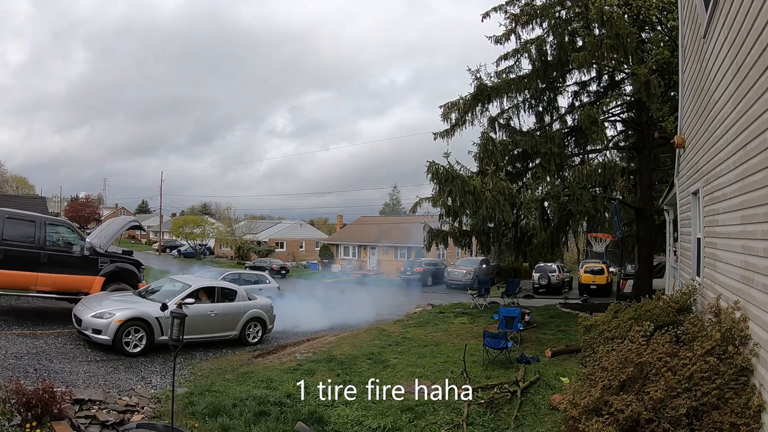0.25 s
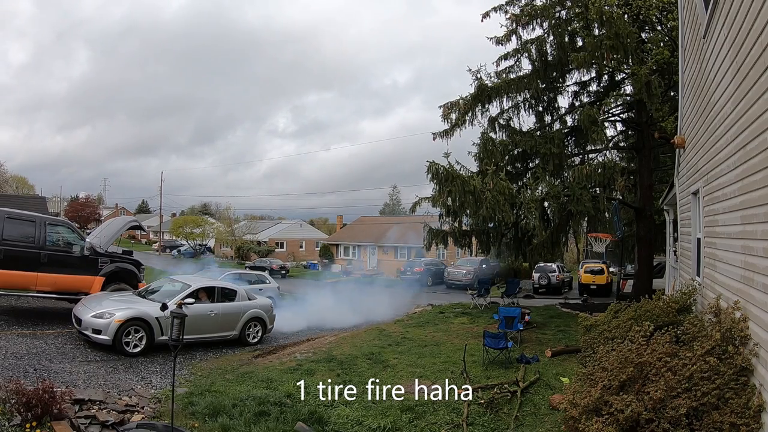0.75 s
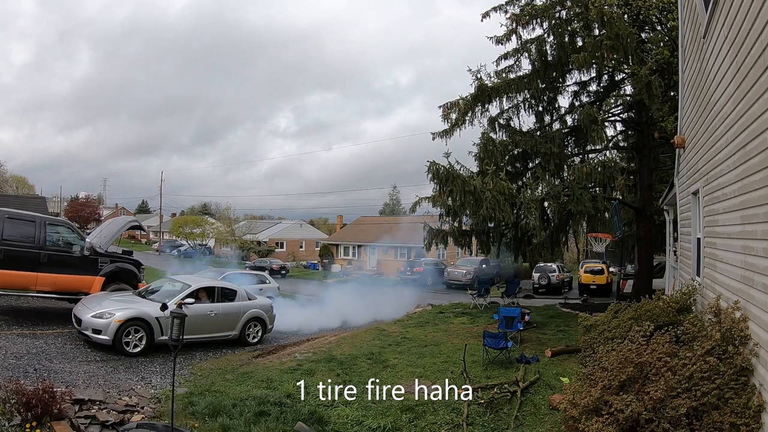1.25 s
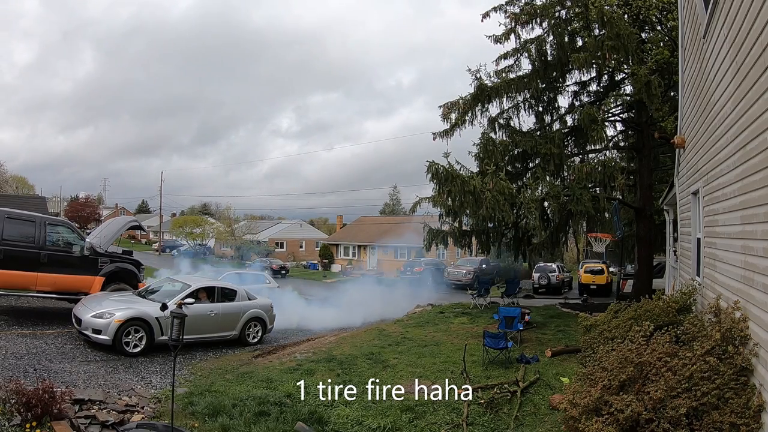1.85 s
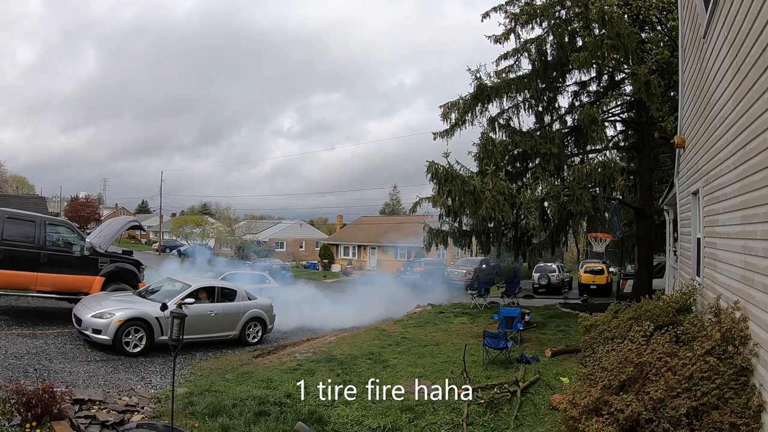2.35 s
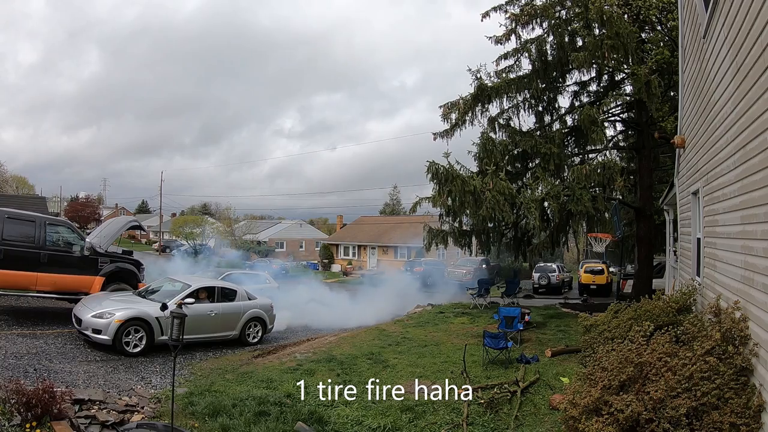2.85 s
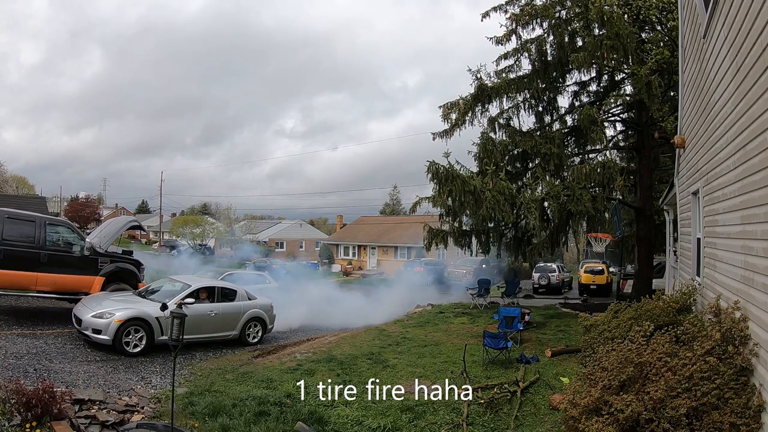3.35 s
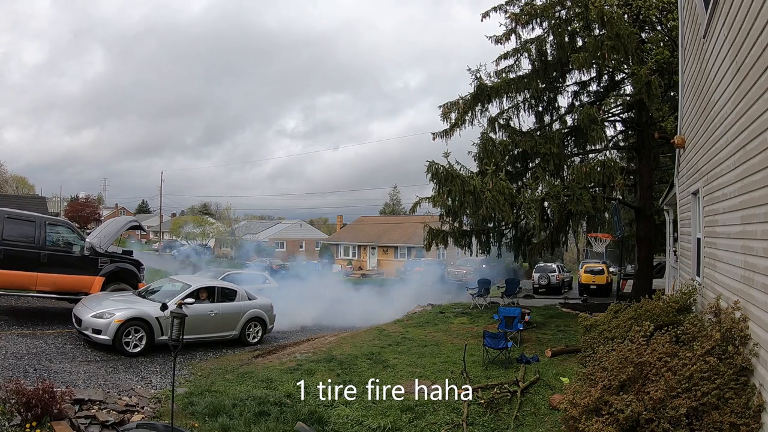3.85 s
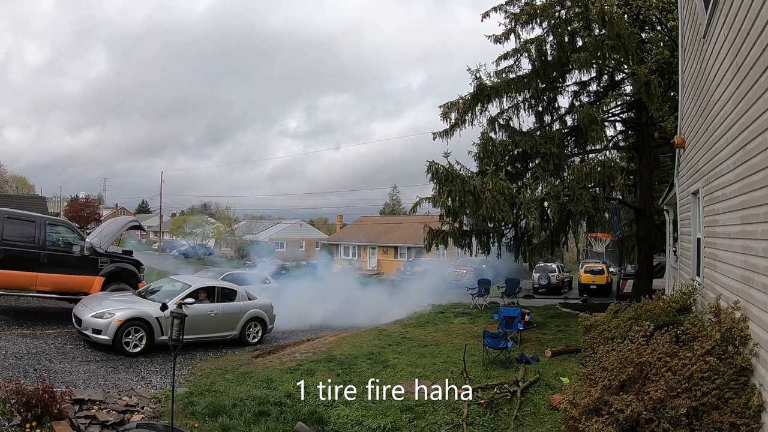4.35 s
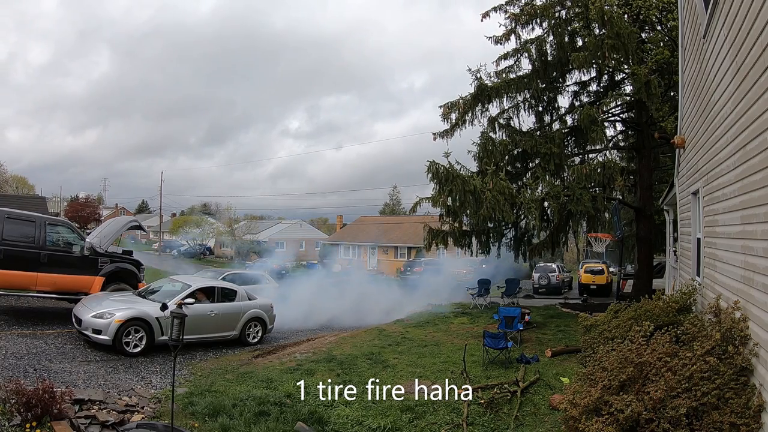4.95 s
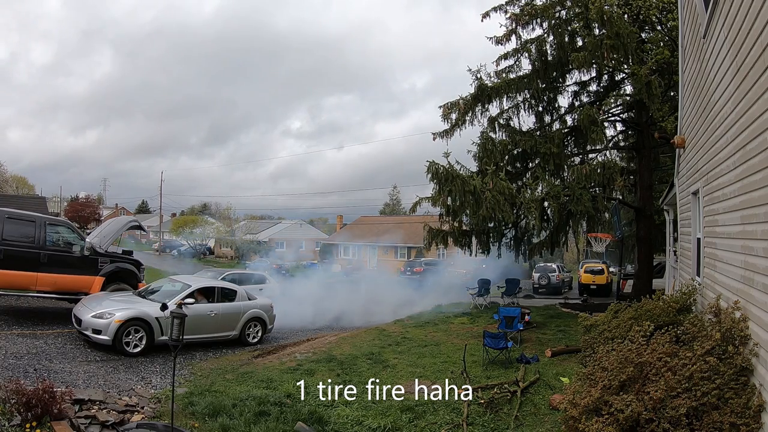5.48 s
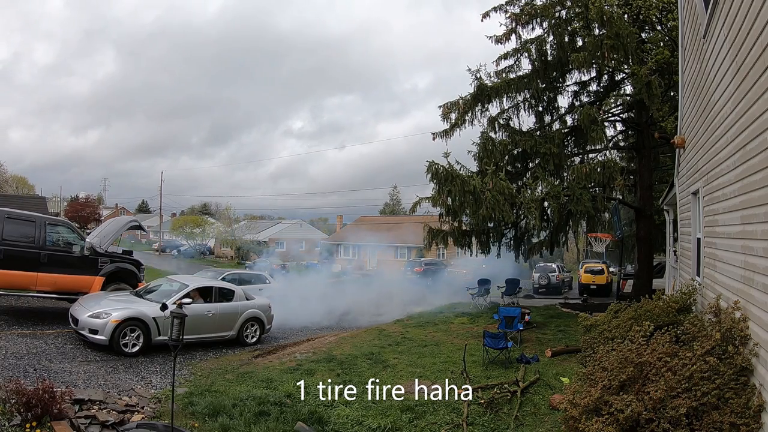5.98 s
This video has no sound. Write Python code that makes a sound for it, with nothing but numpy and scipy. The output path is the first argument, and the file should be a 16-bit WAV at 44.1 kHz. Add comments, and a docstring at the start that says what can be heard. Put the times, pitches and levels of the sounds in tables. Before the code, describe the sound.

A very loud car engine is already at high revs, blaring and rasping through an open exhaust while one spinning tyre hisses roughly on a driveway. The rasp and hiss are strongest at about 0.2 seconds. The engine then bogs down, its booming note falling steadily in pitch. Around 2 seconds the throttle shuts and the tyre hiss dies away, followed by a short spit of air at about 2.4 seconds. From 2.5 to 5.5 seconds the engine holds a quieter, lumpy idle, with a hollow knocking from the muffler and a light chattering hiss. From about 5.5 seconds the revs rise again, with a faint thin whistle swelling twice just before 6 seconds, and are still climbing at the end. It is all heard outdoors from one fixed microphone, with a faint low background rumble.

```python
"""First comes the blare of a rotary engine's open exhaust, over the hiss of one spinning tyre.
The car is in a driveway, heard from one fixed microphone. The burnout bogs down, the throttle
shuts with a spit of air, and the engine drops to a lumpy idle, then picks up with a thin whistle.
Every firing rings the same pipe resonances; gas rasps in the tailpipe under load, and at idle
the muffler shell knocks. Nearby walls, cars and gravel throw the hiss back."""
import sys
import numpy as np
from scipy import signal
from scipy.fft import rfft, irfft, next_fast_len
from scipy.io import wavfile
from scipy.ndimage import uniform_filter1d, map_coordinates

SR = 44100
rng = np.random.default_rng(int(sys.argv[2]) if len(sys.argv) > 2 else 0)


def store_pcm(level_fs):
    """Save levels as 16-bit WAV."""
    pcm = np.round(np.clip(level_fs, -1, 1) * 32767).astype(np.int16)
    wavfile.write(sys.argv[1], SR, np.atleast_2d(pcm).T)


N = 274302

# Engine revs, two firings a shaft turn: time_s, firing_hz
FIRING_RATE = [(0.0, 173.806), (0.085, 164.047), (0.278, 118.248), (0.573, 109.966), (1.044, 89.731),
               (1.411, 80.6), (1.832, 72.607), (1.948, 58.46), (2.259, 40.753), (2.525, 33.344),
               (3.118, 34.852), (4.195, 32.535), (5.298, 32.736), (5.641, 37.878), (6.22, 51.878)]
# Wide open, shut, back to idle, opening again: time_s, opening (0-1)
THROTTLE_OPENING = [(0, 1), (1.82, 0.97), (1.95, 0.44), (2.12, 0), (2.3, 0.19), (2.75, 0.15), (3.5, 0.38),
                    (5.3, 0.37), (5.48, 0.33), (5.63, 0.58), (5.9, 0.61), (6.22, 0.84)]
# The boom swells and sags as the revs cross the pipe's resonances: time_s, level_db
BOOM_LEVEL = [(0.0, -7), (0.07, -10), (0.19, -12.5), (0.22, -11), (0.57, -15.5), (0.69, -18), (0.83, -12.5),
              (1.02, -10.5), (1.61, -11), (2.11, -16.5), (2.15, -20.5), (2.36, -16), (2.49, -22),
              (2.65, -19.5), (3.2, -20), (3.46, -17), (5.16, -16.5), (5.53, -18), (5.58, -15.5),
              (6.22, -14)]
# The engine strains against the tyre at the start: centre_s, half_length_s, extra_bite_db
ENGINE_STRAIN = (0.16, .13, 17.3)
# The tyre grabs: centre_s, half_length_s, extra_hiss_db, extra_rasp_db
TYRE_GRAB = (0.17, 0.1, 8.4, 5.2)
# Load steepens the pulses, more so as the engine lugs: idle_db, load_gain_db, lug_db_per_octave
BITE_LAW = (-16, 13, 19)
# Gain against throttle and revs: open_at_cruise_db, shut_loss_db, revs_db_per_octave
RASP_LAW = (-35, 14.5, 3.5)
HISS_LAW = (-40.5, 18.5, -0.5)

# Resonances: pitch_hz, width_hz, gain_db, polarity
PIPE_MODES = [(65.5, 5.2, -14.5, -1), (74.5, 8.6, -10.5, -1), (112.2, 18.4, -10.5, -1),
              (138.7, 4.85, -5.5, 1), (159.2, 19.85, -0.5, 1), (199.96, 17, 0.48, -1),
              (208.2, 46.05, -2.5, 1), (245.6, 28.6, -2.5, -1), (335.6, 11.4, -10, -1),
              (379.6, 10.8, -20, 1), (407.3, 31, -21.5, -1), (495, 4.4, -36, 1), (528.6, 34, -29, -1),
              (582, 10, -31, 1)]  # the exhaust's boom
TAILPIPE_MODES = [(565, 53, -1, 1), (727, 34, -0.5, -1), (785, 22, -3.5, 1), (920, 20, -3, -1),
                  (965.7, 11, 1, 1), (1132, 26, -3.5, -1), (1424, 34, -15, 1), (1701, 49, -4.5, -1),
                  (1960, 13, -5, 1), (2262, 22, -10, -1), (3450, 19, -9, 1)]  # sing under load
SHELL_MODES = [(738, 29, 0, 1), (946, 21, 4, -1), (1152, 12, 1, 1), (1388, 22, 4, -1), (2136, 28, -2, 1),
               (2780, 16, -5.5, -1), (2954, 54, -13, 1), (3340, 19, -7, -1), (3994, 37, -25.5, 1),
               (4470, 55, -8.5, -1)]  # the muffler shell, knocked at idle
HOLLOW_MODES = [(351.2, 11, 8.5, -1), (420, 36, -10, 1), (543, 53, -8.5, -1), (581.6, 24, 5, 1)]  # pipe notes that one rotor rings harder

# Noise colours: frequency_hz, relative_density_db
GAS_SPECTRUM = [(40, -27), (170, 6), (300, 8), (470, -2), (680, -3), (900, -7), (1400, -10), (2100, -15),
                (3000, -33), (6000, -52.5), (12000, -88.5)]  # turbulent exhaust gas
TYRE_SPECTRUM = [(700, -30), (1700, 1.5), (2600, 1), (3400, 0.5), (4000, -1.5), (4900, 0), (6200, 0),
                 (8200, -10.5), (9700, -18), (10800, -37.5), (12500, -26), (15500, -36.5)]  # rubber scrubbing the driveway
BAY_SPECTRUM = [(900, -26.5), (2000, -5), (3400, -4.5), (4400, -1.5), (5000, -4), (6500, -1.5), (8500, -10),
                (10000, -15), (11200, -21.5), (15500, -46.5)]  # hiss from the engine bay

# A spit of air as the revs fall: start_s, level_db
AIR_SPITS = [(2.3572, -34.5)]
# The whistle swells as the revs pick up: centre_s, half_length_s, peak_db
WHISTLE_SWELLS = [(5.73, .13, -52), (5.936, 0.08, -45)]

IDLE_THROTTLE = 0.39  # above this the engine pulls against the tyre
CRUISE_HZ, LUG_HZ = 100, 114  # firing rates: reference for rasp and hiss; onset of lugging
FULL_SPIN_HZ = 177  # firing rate at which, on full load, the hiss is all tyre
TOP_HZ = 15700


def amp(db):
    """Decibels to amplitude."""
    return 10 ** (np.asarray(db) / 20)


def unit(x):
    """x at rms 1."""
    return x / np.sqrt(np.mean(x ** 2) + 1e-20)


def steady(x):
    """x at rms 1 over every few firings."""
    power = uniform_filter1d(uniform_filter1d(x ** 2, size=SR // 16), size=SR // 20)
    return x / np.sqrt(np.abs(power) + 1e-20)


def curve(rows):
    """One value a sample from (time_s, value) points."""
    return np.interp(np.arange(N) / SR, *np.transpose(rows))


def swell(centre_s, half_s):
    """A bell-shaped rise and fall of height 1."""
    return np.exp(-((np.arange(N) / SR - centre_s) / half_s) ** 2)


def wobble(rate_hz):
    """A smooth random curve, rate_hz knots a second."""
    knots = rng.standard_normal(int(N * rate_hz / SR) + 4)
    return map_coordinates(knots, [np.arange(N) * rate_hz / SR])


def filtered(x, response):
    """x through a complex frequency response."""
    size = next_fast_len(N + SR // 2)
    return irfft(rfft(x, size) * response(np.fft.rfftfreq(size, 1 / SR)), size)[:N]


def noise(spectrum):
    """Noise of rms 1 coloured by (frequency_hz, relative_density_db) points."""
    points_hz, db = np.transpose(spectrum)
    colour = lambda hz: amp(np.interp(np.log(hz + 1), np.log(points_hz), db))
    return unit(filtered(rng.standard_normal(N), colour))


def ring(x, modes):
    """x through damped resonances; the top rolls off above about 7 kHz."""
    def response(hz):
        peaks = sum(polarity * amp(db) * 1j * hz * width / (pitch ** 2 - hz ** 2 + 1j * hz * width)
                    for pitch, width, db, polarity in modes)
        return peaks / (1 + (hz / 7000) ** 6)
    return filtered(x, response)


def pulses(firings, lope_db, scatter_db, jitter_s=40e-6):
    """One impulse at each whole count of firings; one rotor fires harder than the other."""
    count = np.arange(np.ceil(firings[0]), firings[-1]).astype(int)
    slip, scatter = rng.standard_normal((len(count), 2)).T
    on_time = np.interp(count, firings, np.arange(N))
    position = np.clip(on_time + jitter_s * SR * slip, 0, N - 2)
    size = amp(lope_db * (-1) ** count + scatter_db * scatter)
    whole, part = position.astype(int), position % 1
    return np.bincount(whole, size * (1 - part), N) + np.bincount(whole + 1, size * part, N)


def throb(firings, fall_db, lope_db):
    """A rounded puff of gain at each firing, higher for one rotor."""
    count, age = np.divmod(firings, 1)
    return uniform_filter1d(amp(-fall_db * age + lope_db * np.cos(np.pi * count)), size=SR // 110)


def driven_db(law, throttle, firing_hz):
    """The gain of a layer that follows throttle and revs."""
    open_db, shut_db, octave_db = law
    return open_db - shut_db * (1 - throttle) + octave_db * np.log2(firing_hz / CRUISE_HZ)


def exhaust_boom(firings, firing_hz, load, corner_hz=189):
    """Round pulses at idle, steep ones under load, ring the open pipe."""
    idle_db, load_db, lug_db = BITE_LAW
    strain_s, half_s, strain_db = ENGINE_STRAIN
    lug = load ** 4 * np.maximum(np.log2(LUG_HZ / firing_hz), 0)  # only near full load
    bite_db = idle_db + load_db * load + lug_db * lug + strain_db * swell(strain_s, half_s)
    sharp = pulses(firings, lope_db=0.45, scatter_db=0.13, jitter_s=20e-6)
    rounded = filtered(sharp, lambda hz: 1 / (1 + (hz / corner_hz) ** 6))
    return steady(ring(rounded + amp(bite_db) * (sharp - rounded), PIPE_MODES))


def tailpipe_rasp(firings):
    """Under load each firing cracks in the tailpipe and drives out turbulent gas."""
    gate = throb(firings - 0.068, fall_db=4.5, lope_db=-4.5)  # just behind the crack
    cracks = steady(pulses(firings, lope_db=4, scatter_db=1))
    puffs = unit(gate * rng.standard_normal(N))
    gas = unit(gate * noise(GAS_SPECTRUM))
    return steady(ring(cracks + amp(-1) * puffs, TAILPIPE_MODES)) + amp(5) * gas


def tyre_scrub(firings):
    """The spinning tyre scrubs the ground: a rough hiss that pulses with the firings."""
    scrub = noise(TYRE_SPECTRUM) * amp(1.2 * wobble(400) + 0.37 * np.cos(2 * np.pi * firings))
    return driveway_echo(scrub, wet_db=-9, t60_s=0.11)


def driveway_echo(x, wet_db, t60_s):
    """The direct sound plus a short scatter off nearby walls, cars and gravel, at rms 1."""
    t = np.arange(SR // 8) / SR
    tail = rng.standard_normal(len(t)) * amp(-60 * t / t60_s)
    echo = signal.fftconvolve(x, tail / np.linalg.norm(tail))[:N]
    return unit(x + amp(wet_db) * echo)


def engine_hiss(firings, flare_db=4):
    """The engine bay's hiss chatters with each firing, and its treble bands flare at random."""
    bands = signal.stft(noise(BAY_SPECTRUM), nperseg=256)[2]
    flares = uniform_filter1d(rng.standard_normal(bands.shape), size=4, axis=0)
    flares = unit(uniform_filter1d(flares, size=7, axis=1))  # each lasts about 20 ms
    hiss = signal.istft(bands * amp(flare_db * flares), nperseg=256)[1][:N]
    chatter = hiss * throb(firings, fall_db=12, lope_db=1.4)
    return driveway_echo(chatter, wet_db=-2, t60_s=0.066)


def outdoor_rumble():
    """The faint, low background of the open air around the microphone."""
    return noise([(20, -13), (60, -6), (200, -6.5), (1000, -32.5), (8000, -56), (12000, -85.5)])


def idle_knock(firings):
    """At idle one rotor knocks the muffler shell, the other rings hollow notes of the pipe."""
    blows = steady(pulses(firings, lope_db=-2.5, scatter_db=1))
    puffs = unit(throb(firings, fall_db=10.5, lope_db=1) * rng.standard_normal(N))
    shell = steady(ring(blows + amp(4) * puffs, SHELL_MODES))
    hollow = steady(ring(pulses(firings + 0.15, lope_db=4, scatter_db=0.7), HOLLOW_MODES))
    gas = unit(throb(firings, fall_db=2.5, lope_db=-1.5) * noise(GAS_SPECTRUM))
    return amp(-3) * shell + amp(1.5) * hollow + gas


def air_spit(attack_s=0.0037, t60_s=0.11):
    """A quick burst of air after the throttle shuts."""
    level = 0
    for start_s, db in AIR_SPITS:
        age = np.maximum(np.arange(N) / SR - start_s, 0)
        level += amp(db - 60 * age / t60_s) * (1 - np.exp(-age / attack_s))
    return level * noise([(400, 0), (2000, 4), (4500, 0), (8000, -2), (11000, -40), (15000, -31.5)])


def air_whistle(firings):
    """Pulsing air sings in two narrow bands."""
    level = sum(amp(db) * swell(centre_s, half_s) for centre_s, half_s, db in WHISTLE_SWELLS)
    flow = rng.standard_normal(N) * throb(firings, fall_db=3, lope_db=1)
    notes = [(3410, 260, 0.5, 1), (6370, 720, 3, 1)]  # pitch_hz, width_hz, gain_db, polarity
    return level * unit(ring(ring(flow, notes), notes))


def scene():
    """The car from one spot in the driveway: firings set the pulse, throttle and revs the balance."""
    firing_hz, throttle = curve(FIRING_RATE), curve(THROTTLE_OPENING)
    firings = 1.19 + np.cumsum(firing_hz) / SR  # running count
    load = np.clip((throttle - IDLE_THROTTLE) / (1 - IDLE_THROTTLE), 0, 1)
    spin = load * np.sqrt(np.minimum(firing_hz / FULL_SPIN_HZ, 1))
    grab_s, half_s, grab_hiss_db, grab_rasp_db = TYRE_GRAB
    grab = swell(grab_s, half_s)
    rasp_gain = amp(driven_db(RASP_LAW, throttle, firing_hz) + grab_rasp_db * grab)
    hiss_gain = amp(driven_db(HISS_LAW, throttle, firing_hz) + grab_hiss_db * grab)

    boom = amp(curve(BOOM_LEVEL)) * exhaust_boom(firings, firing_hz, load)
    rasp = rasp_gain * np.sqrt(load) * tailpipe_rasp(firings)
    knock = rasp_gain * np.sqrt(1 - load) * idle_knock(firings)
    outdoors = amp(-42.5) * outdoor_rumble()
    air = air_spit() + air_whistle(firings)
    tyre = hiss_gain * amp(2) * np.sqrt(spin) * tyre_scrub(firings)
    bay = hiss_gain * amp(-0.5) * np.sqrt(1 - spin) * engine_hiss(firings)
    return (boom + rasp + tyre + bay + outdoors + knock + air)[None]


def record(dry):
    """The sound is mono, with no treble above 15.7 kHz."""
    return filtered(dry[0], lambda hz: hz < TOP_HZ)[None]


dry = scene()
out = record(dry)
store_pcm(out)
```